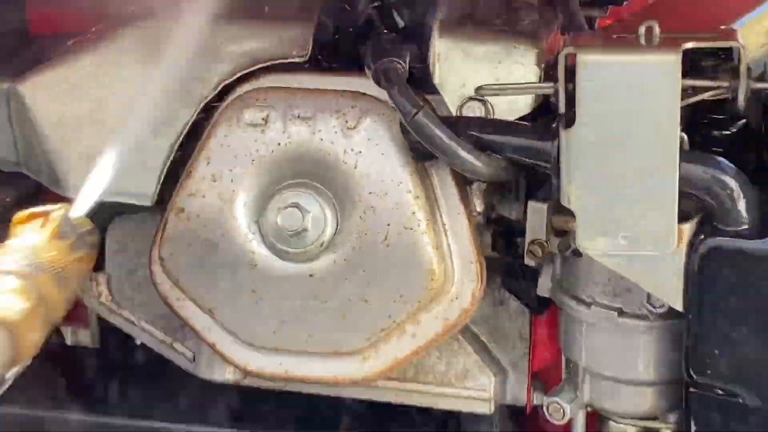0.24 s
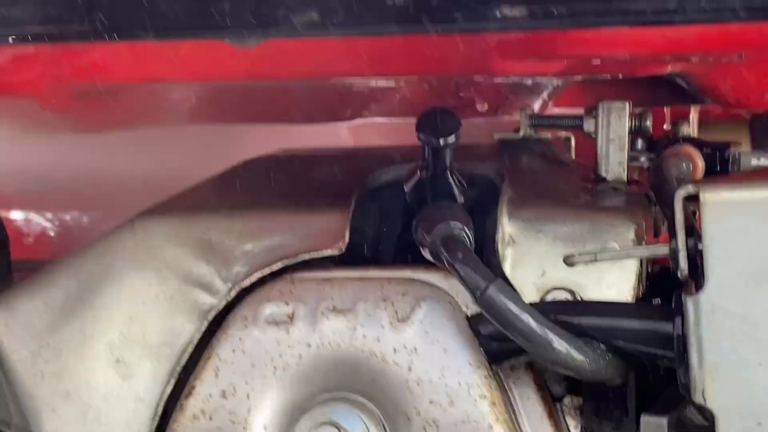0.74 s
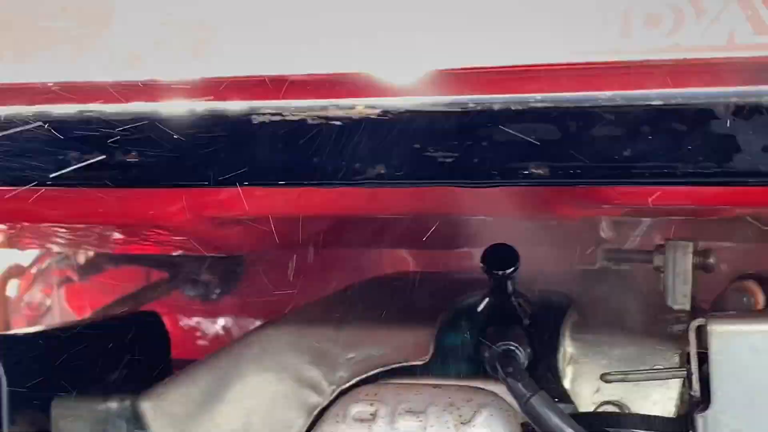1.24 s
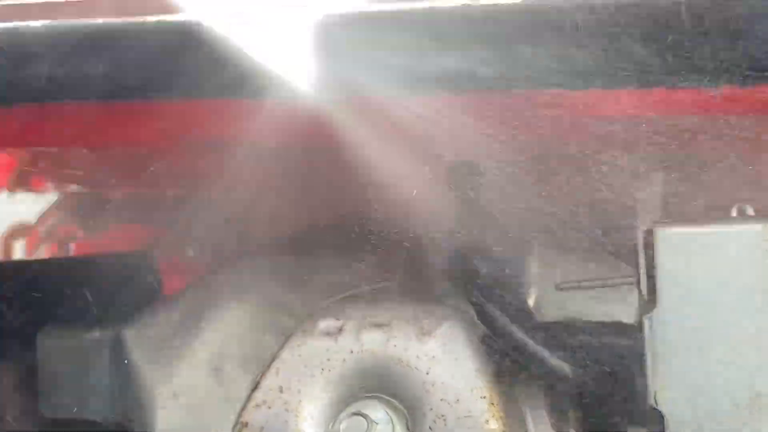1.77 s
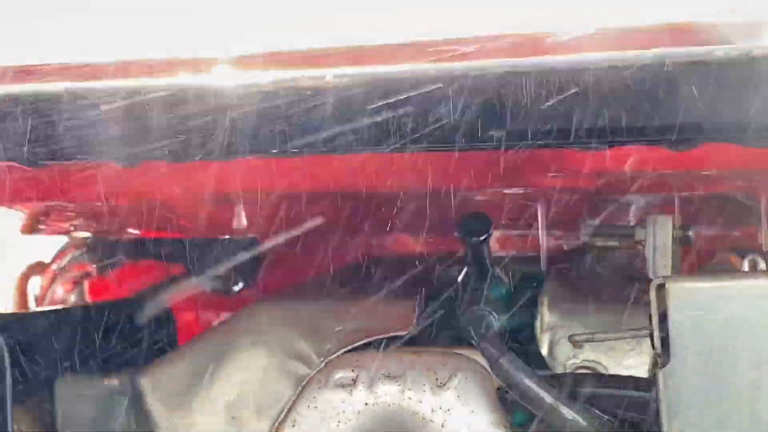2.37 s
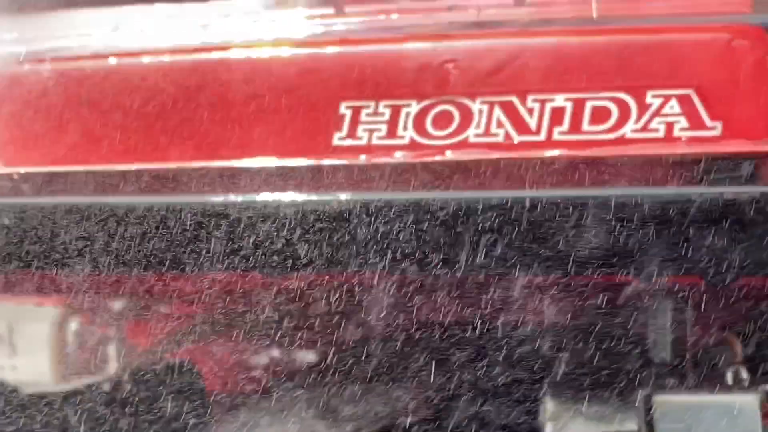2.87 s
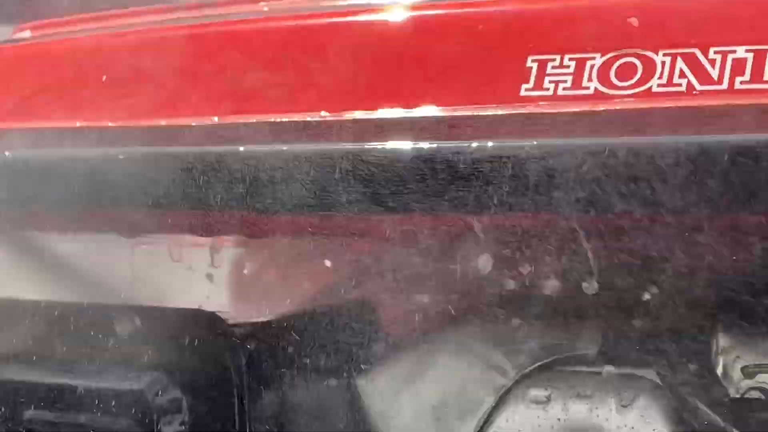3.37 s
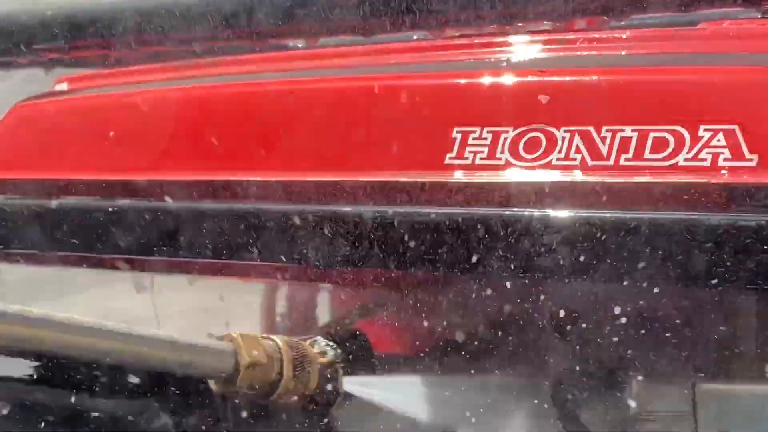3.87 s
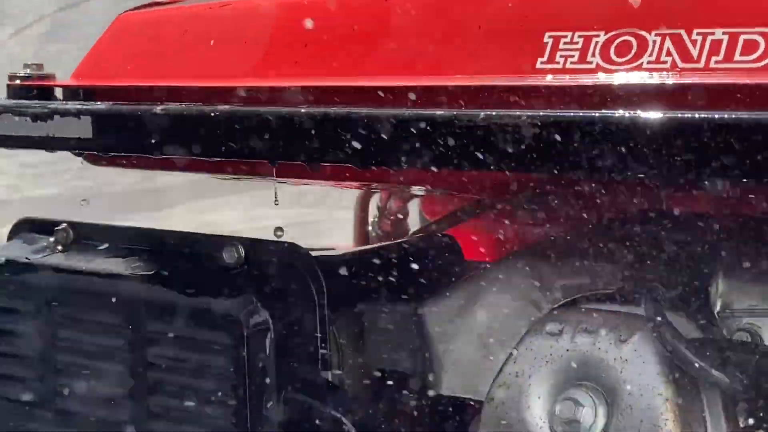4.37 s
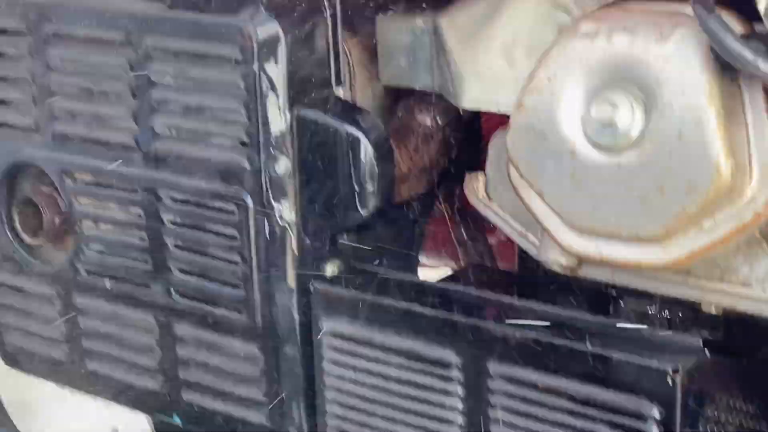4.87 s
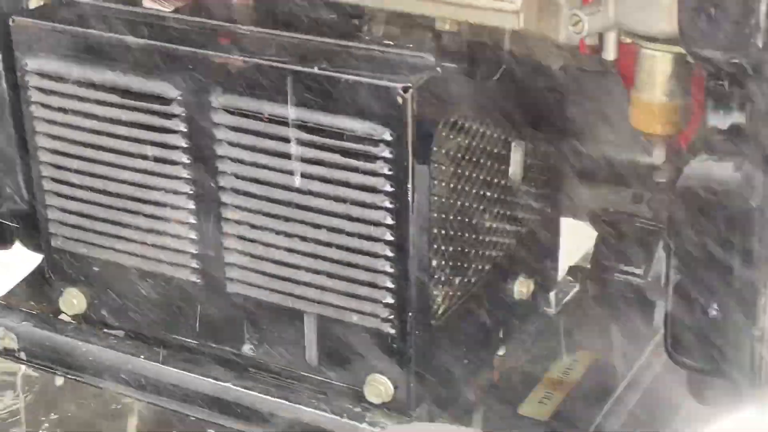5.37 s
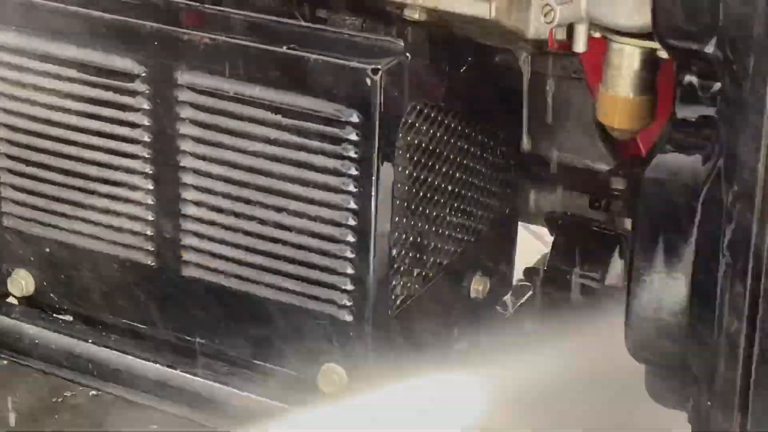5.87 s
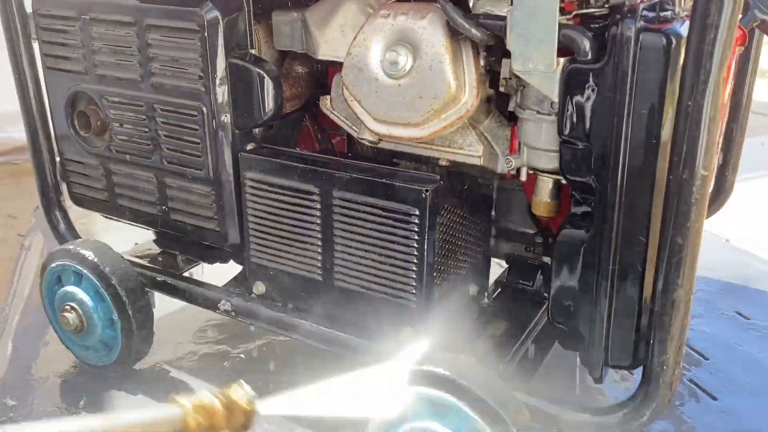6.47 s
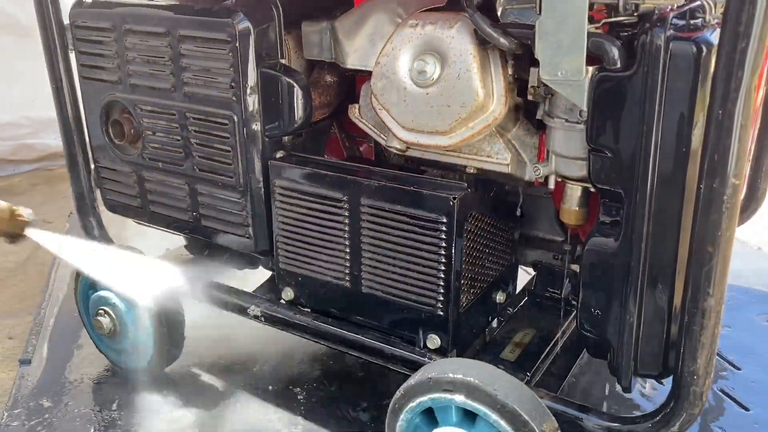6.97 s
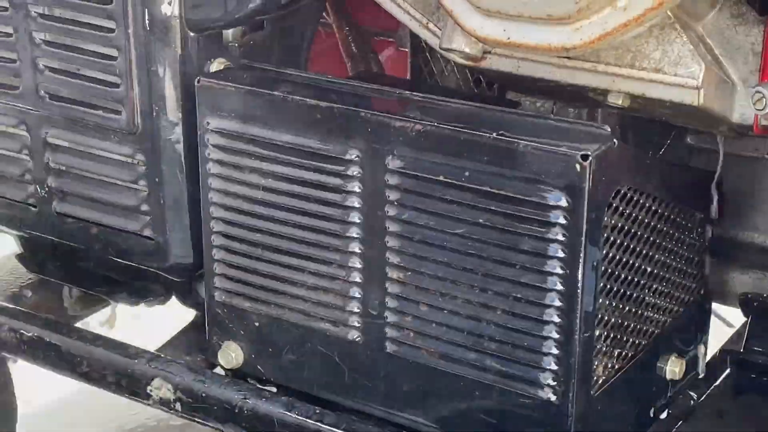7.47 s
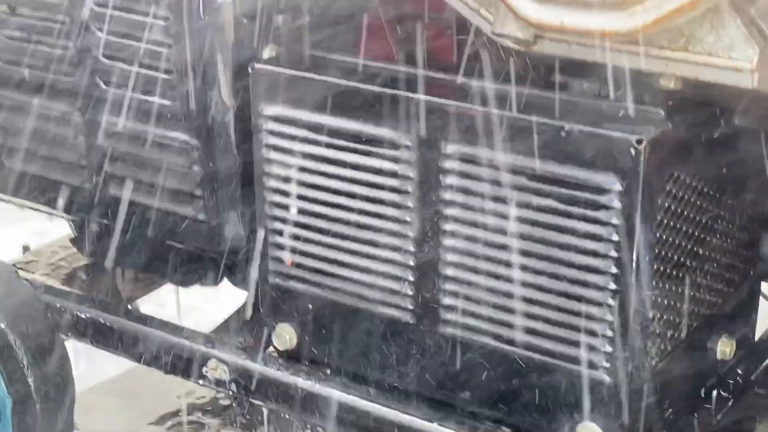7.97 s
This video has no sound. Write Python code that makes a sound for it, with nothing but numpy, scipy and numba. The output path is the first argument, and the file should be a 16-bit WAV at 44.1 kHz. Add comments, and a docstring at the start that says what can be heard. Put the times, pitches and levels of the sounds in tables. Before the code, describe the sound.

A soft watery hiss swells within a third of a second into a forceful spray on steel. The jet sputters across engine, tank, tube and covers, its tone changing with each part, with short splashes and brief dropouts. A pump drones below with a high whine. Near microphone, open yard, mostly narrow stereo, widening between about six and seven seconds.

```python
"""A soft hiss and churn of water over a pump's tone, soon surging: a pressure washer sweeps its fan jet
over the steel frame and engine of a portable generator, outdoors. The hiss is turbulent noise; random drop
impacts, filtered, sizzle on metal, churn in gaps and drum on panels. Parts ring in their modes, short bursts of
splash and airy noise break in, a slot whistles. Pump and motor are sums of sines; vent and yard filtered noise."""
import sys
import numpy as np
from scipy import signal
from scipy.fft import rfft, irfft
from scipy.io import wavfile
from scipy.ndimage import uniform_filter1d
from numba import njit

SR = 44100
rng = np.random.default_rng(int(sys.argv[2]) if len(sys.argv) > 2 else 0)


def master_out(mix):
    """Clip the mix to full scale and print it as 16-bit PCM to the path in sys.argv[1]."""
    frames = np.transpose(np.atleast_2d(mix))
    ceiling = np.clip(frames, -1, 1)
    pcm = np.round(ceiling * 32767).astype(np.int16)
    wavfile.write(sys.argv[1], SR, pcm)


N = 363384
TIME, FREQ = np.arange(N) / SR, np.arange(N // 2 + 1) * SR / N


def undb(db):
    """Level definition: decibels to amplitude gain."""
    return 10 ** (np.asarray(db) / 20)


def unit(x):
    """Effective value: scale to an rms of 1."""
    return x / np.sqrt(np.mean(x ** 2))


def curves(table):
    """Linear interpolation in time: one value a sample for each column after t."""
    s, *columns = np.transpose(table)
    return [np.interp(TIME, s, c) for c in columns]


def response(points):
    """Frequency response: gain at every frequency from (f/Hz, level/dB) points on a log axis."""
    hz, db = np.transpose(points)
    return undb(np.interp(np.log(FREQ + 1), np.log(hz), db))


def colour(x, gain):
    """Linear filtering: multiply the spectrum by a gain at every frequency."""
    return irfft(rfft(x) * gain, N)


def resonance(hz, width_hz):
    """Damped oscillator: response of one mode, gain 1 at its centre."""
    return 1j * FREQ * width_hz / (hz ** 2 - FREQ ** 2 + 1j * FREQ * width_hz)


@njit
def moving_band(x, hz, width):
    """Time-varying resonance: a state-variable band-pass whose centre moves."""
    y, band, low = np.empty(len(x)), 0., 0.
    for i in range(len(x)):
        g, k = np.tan(np.pi * hz[i] / SR), width / hz[i]
        v = (band + g * (x[i] - low)) / (1 + g * (g + k))
        band, low, y[i] = 2 * v - band, low + 2 * g * v, k * v
    return y


def hollow(x, hz, width_hz):
    """Cavity resonance: the ring of an enclosed space whose pitch moves."""
    return np.array([moving_band(c, hz, float(width_hz)) for c in x])


def walk(rate):
    """Low-passed randomness: smooth wandering, spread 1, up to about rate turns a second."""
    return unit(colour(rng.standard_normal(N), 1 / (1 + (FREQ / rate) ** 4)))


def noise():
    """Turbulence: white noise as a direct (mid) and a scattered (side) part."""
    return rng.standard_normal((2, N))


def drops(rate):
    """Shot noise: random impacts of unequal size, rate a second, mid and side."""
    hit = rng.random((2, N)) < rate / SR
    size_db = 2 * np.clip(noise(), -2, 2)
    return unit(hit * noise() * undb(size_db))


DWELL_ATTACK_S, DWELL_RELEASE_S = 0.014, 0.032


def hold(start, length, attack_s=DWELL_ATTACK_S, release_s=DWELL_RELEASE_S):
    """Gated excitation: a linear attack, a hold and a linear release."""
    rise, fall = (TIME - start) / attack_s, (start + length - TIME) / release_s
    return np.clip(np.minimum(rise, fall) + .5, 0, 1)


# the jet dwells on a part: start t/s, length t/s, level/dB before each sound's own gain,
# depth 0-1 (0 bare face, .5 gap, 1 hollow behind a sheet panel)
DWELLS = [(.12, 0.072, -32, 1), (.31, 0.09, -23.5, 0.77), (0.484, 0.059, -24, 0.027),
          (.64, 0.066, -26, 0.64), (.72, 0.21, -28.5, 1), (1.36, 0.3, -32.5, 0.72),
          (1.62, 0.14, -29.5, 0.66), (1.76, 0.058, -30.5, 0.68), (2.56, 0.077, -34.5, 0.61),
          (3.191, 0.12, -32, 0.83), (3.21, 0.078, -30.5, 0.17), (3.401, 0.14, -30.5, 0.76),
          (3.71, 0.034, -33, 0.78), (3.96, 0.18, -34, 0.43), (4.243, 0.022, -25, .1), (4.3, 0.032, -27, .1),
          (4.558, .46, -37, 0.94), (5.031, 0.1, -29.5, 0.3), (5.27, 0.027, -30, 0.17),
          (5.34, 0.081, -31, 0.51), (5.45, 0.13, -23, 0.24), (5.529, 0.12, -30.5, 0.32),
          (5.66, 0.283, -29.5, 0.68), (5.925, 0.071, -25.5, 0.12), (6.149, 0.089, -29.5, 0.3),
          (6.35, 0.12, -32, 0.6), (6.53, .11, -28, 0.089), (6.929, 0.053, -28, 0.42),
          (7.481, 0.17, -36.5, 0.67), (7.63, 0.12, -29.5, 0.66), (7.78, 0.042, -25.5, 0.61),
          (7.701, 0.095, -26.5, 0.13)]
# which depth wakes each sound: best depth 0-1, reach in depth, gain at the best depth level/dB
WAKES = {"hiss": (0, 0.41, -7.5), "sizzle": (0.017, 0.66, -0.46), "churn": (0.48, 0.21, 0.12),
         "drum": (0.96, 0.51, -3.5)}


def woken(name, steady_db):
    """Power summation: level/dB of one sound, its steady part plus every dwell near its best depth."""
    best, reach, best_db = WAKES[name]
    power = undb(steady_db) ** 2
    for start, length, db, depth in DWELLS:
        match = .5 ** (((depth - best) / reach) ** 2)
        power = power + (hold(start, length) * undb(db + best_db) * match) ** 2
    return 10 * np.log10(power)


GAP_SHALLOW_HZ, GAP_FALL_OCTAVES, RESTING_DEPTH = 2650, 1.63, 0.37


def gap_pitch(runoff_db):
    """Cavity tuning: the gap rings lower the deeper the jet reaches, back at rest between dwells."""
    weight = undb(runoff_db)
    depths = weight * RESTING_DEPTH
    for start, length, db, depth in DWELLS:
        force = hold(start, length) * undb(db)
        weight, depths = weight + force, depths + force * depth
    return GAP_SHALLOW_HZ * 2 ** (-GAP_FALL_OCTAVES * depths / weight)


# aim of the fan toward the listener: t/s, gain above BEAM_HZ level/dB
AIM = [(0, 5), (1.7, -.5), (2.8, 0.5), (3.6, -0.5), (4.7, -6.5), (5.6, 0.5), (7.2, -0.5), (8, 6.5)]
BEAM_HZ = 9700


def beamed(x):
    """Directivity: the highest hiss is beamed and brightens as the fan turns to the listener."""
    aim_db, = curves(AIM)
    top = colour(x, 1 - 1 / (1 + (FREQ / BEAM_HZ) ** 8))
    return x + top * (undb(aim_db) - 1)


# steady spray as the wand moves nearer and farther, before dwells, misses and trims:
# t/s, nozzle hiss level/dB, droplet sizzle level/dB, churning run-off level/dB
WAND = [(0, -39.5, -37, -36.5), (.25, -31.5, -29, -33), (.85, -32.5, -31, -36.5), (.95, -26.5, -27.5, -36),
        (1.42, -31.5, -28, -42), (1.85, -30.5, -29, -39), (2.5, -29, -33.5, -46), (2.75, -32, -37.5, -50),
        (3.04, -32, -36.5, -62), (3.12, -34.5, -36.5, -50), (3.76, -33, -36.5, -46),
        (3.97, -29.5, -34.5, -36), (4.47, -30, -26.5, -36), (4.7, -30.5, -28, -34.5),
        (5.22, -32, -30.5, -39.5), (6.3, -34, -32, -35), (6.8, -37, -39, -38), (7.65, -36.5, -31, -36.5),
        (8.24, -40, -33.5, -38.5)]
# the jet slips through an opening and meets less metal: start t/s, length t/s, change of level/dB
MISSES = [(0.58, 0.062, -3), (1.544, 0.062, -5.5), (2.318, 0.06, -7), (3.556, 0.13, -12),
          (6.086, 0.048, -2.5), (6.378, 0.039, -14)]
# relative spectra of the four sounds of the spray: f/Hz, level/dB
HISS = [(1500, -55), (4000, -1.5), (7000, -0.5), (9000, 0), (11000, 1), (13300, 0), (15800, -1.5)]
SIZZLE = [(1200, -18.5), (2400, -1.5), (3200, -3.5), (4300, -2), (5400, -0.5), (7000, -5), (11000, -30)]
CHURN = [(400, -41), (800, -1.5), (1100, 3.5), (1450, 2), (2000, -3), (2600, -0.5), (4000, -34)]
DRUM = [(30, -50), (55, -60), (85, -7), (130, -7.5), (220, 2), (380, 4), (520, 7), (800, 3), (1100, 0.5),
        (2000, -9)]
# ringing of the frame and covers: f/Hz, width f/Hz, level/dB over the broad splash
FRAME = [(758, 97, 0), (1474, 140, -5.5), (1640, 79, -18), (1900, 810, 0.5), (3160, 1100, 4.5),
         (3760, 130, -9)]
MISS_HISS_SHARE, MISS_CHURN_SHARE = 0.29, .5  # shares of a miss's dB that these sounds lose
RUNOFF_DRUM_DB = -2  # drumming of the panels against the run-off
GAP_RING, GAP_WIDTH_HZ = .6, 310
PANEL_RATIO, PANEL_WIDTH_HZ, PANEL_RING = 0.68, 250, 0.4  # the panel rings at this share of the gap's pitch


def spray():
    """Jet break-up and forced vibration: turbulence, drops and slugs set the steel ringing."""
    nozzle_db, droplet_db, runoff_db = curves(WAND)
    miss_db = sum(db * hold(start, length) for start, length, db in MISSES)
    hiss_db = woken("hiss", nozzle_db + MISS_HISS_SHARE * miss_db)
    sizzle_db = woken("sizzle", droplet_db + miss_db)
    churn_db = woken("churn", runoff_db + MISS_CHURN_SHARE * miss_db)
    drum_db = woken("drum", runoff_db + RUNOFF_DRUM_DB)
    gap_hz = gap_pitch(runoff_db)
    steel = 1 + sum(undb(db) * resonance(hz, width) for hz, width, db in FRAME)
    # the harder the jet bites into the frame, the more the whole splash sputters
    sputter = walk(rate=22.5) * undb(0.38 * (churn_db - churn_db.max()))
    hiss = unit(colour(noise() + 0.15 * drops(rate=1100), response(HISS)))
    sizzle = unit(colour(drops(rate=20000), response(SIZZLE) * steel))
    churn = unit(colour(drops(rate=10000), response(CHURN) * steel))
    drum = unit(colour(drops(rate=3000), response(DRUM) * steel))
    # the gap behind the struck spot rings at a pitch that follows the jet and wavers
    wavering_hz = gap_hz * undb(walk(rate=41))
    churn = unit(churn + GAP_RING * hollow(churn, wavering_hz, GAP_WIDTH_HZ))
    drum = unit(drum + PANEL_RING * hollow(drum, PANEL_RATIO * gap_hz, PANEL_WIDTH_HZ))
    # each sound: its level, a fixed trim where given, shared sputter and its own flutter, all in dB
    return (beamed(hiss) * undb(hiss_db + 3.5 + 1.44 * sputter)
            + sizzle * undb(sizzle_db - 1.33 + 2.0 * sputter + 0.32 * walk(rate=28))
            + churn * undb(churn_db + 1.0 * sputter + 1.4 * walk(rate=26))
            + drum * undb(drum_db + 0.28 * sputter + 2.0 * walk(rate=19.5)))


# mean speed of the washer's motor: t/s, shaft f/Hz
MOTOR = [(0, 502.2), (1.2, 500.5), (3, 500.2), (4.9, 501), (5.6, 502), (6.9, 502.1), (7.6, 502.6),
         (8.24, 502.1)]
# pump overtones: multiple of the pump shaft, level/dB before the hum gain
PUMP = [(8, -62), (9, -59), (10, -61), (12, -61), (13, -55), (15, -62), (29, -59)]
# the washer as heard from each standing place: t/s, pump hum gain level/dB,
# piston stroke tone level/dB, its octave level/dB, commutator whine level/dB
WASHER = [(0, -3, -43, -51.5, -45), (.85, 8, -42, -46.5, -39), (1.05, 6, -50, -54, -43),
          (2.4, 3, -52.5, -54, -51), (3.7, 3.5, -55.5, -50.5, -46), (4.5, 2, -53, -57, -44),
          (5.6, 9, -50, -48, -44), (6.4, 7, -54.5, -48, -52), (7, 8.5, -49, -47.5, -45),
          (7.5, 6.5, -54, -41.5, -41), (8.24, 10, -48, -44, -41.5)]
GEAR_RATIO, COMMUTATOR_BARS, PISTONS = 50 / 11, 22, 3
WHINE_FLUTTER_DB, STROKE_FLUTTER_DB, HUM_FLUTTER_DB = 1.8, 1.6, 1.5


def washer():
    """Harmonics of rotation: a brush motor geared down to a three-piston pump, each overtone wavering."""
    motor_hz, = curves(MOTOR)
    hum_db, stroke_db, octave_db, whine_db = curves(WASHER)
    motor = 2 * np.pi * np.cumsum(motor_hz * (1 + 0.00019 * walk(rate=13.0))) / SR  # shaft angle
    pump = motor / GEAR_RATIO
    hum = stroke = 0
    for k, db in PUMP:
        hum = hum + undb(db + HUM_FLUTTER_DB * walk(rate=8.2)) * np.sin(k * pump + rng.uniform(0, 2 * np.pi))
    for k, db in enumerate([stroke_db, octave_db], 1):
        stroke = stroke + undb(db + STROKE_FLUTTER_DB * walk(rate=19)) * np.sin(k * PISTONS * pump)
    whine = undb(whine_db + WHINE_FLUTTER_DB * walk(rate=22)) * np.sin(COMMUTATOR_BARS * motor)
    return np.sqrt(2) * (hum * undb(hum_db) + stroke + whine)  # rms levels to sine peaks


def vent():
    """Flow noise through a resonance: cooling air in the motor's vents, nearer or farther with its hum."""
    hum_db = curves(WASHER)[0]
    air = unit(colour(noise(), resonance(3260, width_hz=380) ** 2))
    return air * undb(-48.5 + .5 * hum_db)


# relative spectrum of the low rush of the yard: f/Hz, level/dB
YARD = [(30, -52), (50, -52), (85, -1.5), (150, 3), (300, -1.5), (700, 3), (1500, -0.5), (5000, -12)]


def yard():
    """Diffuse background: steady noise shaped by one spectrum."""
    return undb(-46.0) * unit(colour(noise(), response(YARD)))


# modes of the parts that the jet rests on: f/Hz, nominal width f/Hz, relative level/dB
PART_MODES = {"valve cover": [(1270, 110, -1), (2200, 82, 1.5), (3180, 160, 1), (4420, 210, -4)],
              "tank": [(1330, 98, -1), (2460, 170, -4), (3170, 120, 4), (4003, 250, 4), (5080, 340, 5)],
              "frame tube": [(1690, 350, 0), (2970, 110, 3.5), (3600, 130, 1)], "cover": [(780, 120, 1.5),
              (1055, 160, 4), (1510, 550, 0), (3850, 100, -3), (4800, 130, -9)],
              "base rail": [(1120, 140, -2), (1390, 150, -2), (1990, 250, -0.5), (3440, 93, -1),
              (3750, 100, -2.5)], "wheel": [(540, 180, -0.5), (1024, 230, 1.5), (1470, 300, -5.5)]}
# the jet rests on a part and rings it: start t/s, length t/s, level/dB before flutter
RESTS = {"valve cover": [(.32, .06, -24)], "tank": [(.9, 0.38, -35.5), (1.75, .78, -35)],
         "frame tube": [(3.88, 0.59, -36)], "cover": [(4.56, 0.2, -28), (4.79, 0.23, -27.5),
         (5.66, 0.234, -34)], "base rail": [(5.915, 0.15, -29.5), (6.14, 0.14, -28.5), (6.515, 0.15, -29),
         (6.7, 0.04, -30)], "wheel": [(6.76, 0.14, -32), (7.115, 0.22, -33), (7.345, 0.1, -33),
         (7.58, 0.18, -33)]}
REST_EDGE_S = 0.024
PART_FILL_DB, PART_FLUTTER_DB = -13.5, 1  # splash between the modes; sputter of the stream


def parts():
    """Modal excitation: a dense stream of drops rings each part in its own modes while the jet rests on it."""
    out, stream = np.zeros((2, N)), rfft(drops(rate=7000))
    for name, modes in PART_MODES.items():
        power = force = 0
        for hz, width, db in modes:
            mode = np.abs(resonance(hz, 1.25 * width)) ** 4
            fill = undb(PART_FILL_DB) ** 2 * np.abs(resonance(hz, .5 * hz)) ** 4
            power = power + undb(db) ** 2 * (mode + fill)
        for start, length, db in RESTS[name]:
            force = force + hold(start, length, REST_EDGE_S, REST_EDGE_S) * undb(db)
        out += unit(irfft(stream * np.sqrt(power), N)) * force
    return out * undb(PART_FLUTTER_DB * walk(rate=29))


def swell(start, length):
    """Transient envelope: a nearly even rise and fall."""
    u = np.clip((TIME - start) / max(length, .005), 0, 1)
    return np.abs(np.sin(np.pi * u ** 1.03))


# brief bursts of splash, from sharp slaps to longer soft swells:
# t/s, nominal peak level/dB, centre f/Hz, length t/s
SPLASH_BURSTS = [(0.321, -9, 3160, 0.064), (0.366, -13, 685, 0.045), (0.461, -12.5, 790, 0.039),
                 (1.395, -10, 1450, 0.026), (1.51, -8.5, 1480, 0.049), (1.61, -19, 1640, 0.18),
                 (3.207, -24, 800, 0.087), (3.416, -24.5, 1000, 0.15), (3.842, -8, 3700, 0.0088),
                 (3.843, -16, 1950, 0.017), (3.875, -14, 2640, 0.026), (4.05, -18, 1900, 0.016),
                 (4.092, -11, 3520, 0.016), (4.115, -7.5, 3030, 0.039), (4.175, -13, 850, 0.035),
                 (4.35, -13, 3400, 0.027), (4.872, -21, 855, 0.017), (5.137, -14, 5500, 0.013),
                 (5.346, -25, 500, 0.022), (5.48, -14, 1910, 0.028), (5.8, -14.5, 1130, 0.053),
                 (6.358, -13, 5200, 0.0098), (6.373, -15.5, 1200, 0.041), (6.447, -12, 5000, 0.0072),
                 (6.505, -17, 1450, 0.032), (7.657, -11.5, 990, 0.054)]
# short flat-topped bursts of airy noise, some narrow, some broad:
# t/s, length t/s, f/Hz, nominal width f/Hz, level/dB
AIR_BURSTS = [(.415, 0.045, 13400, 1530, -30), (0.487, 0.081, 8800, 1500, -30.5),
              (0.872, 0.16, 4370, 2000, -28.5), (2.064, 0.067, 5300, 2000, -32),
              (5.084, 0.032, 4250, 1300, -28), (5.257, 0.047, 2330, 1100, -30),
              (5.25, 0.046, 4510, 490, -36), (6.271, 0.073, 5660, 3400, -28.5),
              (6.434, 0.074, 4800, 3000, -30), (7.007, 0.076, 5150, 1200, -32),
              (7.443, 0.039, 5400, 1500, -31.5)]
SPLASH_RMS_DB = -12.5  # rms of a splash burst's noise against its nominal peak
THUD_HZ, THUD_DB = 176, -31  # a dull thud under each splash burst; dB against its nominal peak
THUD_FADE_HZ = 1490  # splash bursts brighter than this hardly thud
AIR_EDGE_S = 0.011


def bursts():
    """Gated band noise: bursts of splash with a dull thud, and flat-topped bursts of airy noise."""
    out, splash, air = np.zeros((2, N)), rfft(drops(rate=30000)), rfft(noise())
    thud = undb(THUD_DB) * unit(irfft(air * resonance(THUD_HZ, THUD_HZ) ** 2, N))
    for s, db, hz, length in SPLASH_BURSTS:
        burst = undb(SPLASH_RMS_DB) * unit(irfft(splash * resonance(hz, hz) ** 2, N))
        faded_thud = thud / (1 + (hz / THUD_FADE_HZ) ** 2)
        out += (burst + faded_thud) * swell(s, length) * undb(db)
    for s, length, hz, width, db in AIR_BURSTS:
        burst = unit(irfft(air * resonance(hz, width) ** 2, N))
        out += burst * hold(s, length, AIR_EDGE_S, AIR_EDGE_S) * undb(db)
    return out


# the jet runs along a slot in the frame and whistles: t/s, f/Hz, level/dB
WHISTLE = [(2.5, 4050, -60), (2.62, 4040, -37), (2.82, 4165, -44), (3.02, 4500, -36.5), (3.14, 4500, -46),
           (3.38, 4350, -54), (3.45, 4480, -33), (3.56, 4550, -57)]
WHISTLE_WIDTH_HZ = 240


def whistle():
    """Narrow-band flow tone: an airy whistle, noise through two moving resonances, that drifts mostly upward."""
    hz, db = curves(WHISTLE)
    once = hollow(noise(), hz, WHISTLE_WIDTH_HZ)
    return unit(hollow(once, hz, WHISTLE_WIDTH_HZ)) * undb(db)


# strength of the random colouring: f/Hz, spread level/dB
COLOURING = [(2500, 2.3), (9000, 1.8)]


def random_colouring(x):
    """Random spectral modulation: bands of the splash wax and wane in about a tenth of a second."""
    hz, _, z = signal.stft(x, SR, nperseg=1024)
    field = rng.standard_normal(z.shape[1:])
    for _ in range(2):
        field = uniform_filter1d(uniform_filter1d(field, size=7, axis=0), size=9, axis=1)
    spread_db = np.interp(hz, *np.transpose(COLOURING))[:, None]
    gain = undb(spread_db * unit(field))
    gain = gain / np.sqrt(np.mean(gain ** 2, axis=1, keepdims=True))  # unit mean power gain in each band
    return signal.istft(z * gain)[1][:, :N]


# the band swallowed by the space behind the covers: t/s, f/Hz, depth 0-1
DIP = [(4.4, 2700, 0.05), (4.7, 2970, 0.7), (5.8, 2860, 0.35), (7, 2410, 0), (7.55, 2380, 0.8),
       (7.85, 2690, .45)]


def cavity_dip(x):
    """Resonant absorption: the space behind the covers swallows one band, sliding as the wand moves along."""
    hz, depth = curves(DIP)
    return x - np.clip(depth, 0, 1) * hollow(x, hz, width_hz=260)


# echo off the panel beside the spray: t/s, delay t/ms, strength 0-1
BOUNCE = [(0, 0.78, 0.04), (1.9, 0.67, 0.13), (2.6, 0.61, 0.2), (3.05, 0.92, 0), (3.4, 0.98, 0.15),
          (4.4, 0.29, 0.11), (6.4, 0.565, 0), (7.1, 0.54, 0.22), (8.24, 0.71, 0)]


def panel_echo(x):
    """Comb filtering: a near panel returns the splash a moment later; the comb slides as the wand moves."""
    delay_ms, strength = curves(BOUNCE)
    then = TIME - delay_ms / 1000
    echo = np.array([np.interp(then, TIME, c) for c in x])
    return (x + strength * echo) / np.sqrt(1 + strength ** 2)


def ports(mid, side, width, lean):
    """Mid-side decoding: left and right from the direct and the scattered sound."""
    side, tilt = colour(side, response(width)), np.sqrt(response(lean))
    left, right = 2 * tilt / (tilt + 1 / tilt), 2 / tilt / (tilt + 1 / tilt)
    return np.array([colour(mid + side, left), colour(mid - side, right)])


# stereo image: f/Hz, side gain when narrow level/dB, side gain when open level/dB,
# left minus right when open level/dB
IMAGE = [(200, -20, -13, 2.5), (500, -19.5, -6.5, -0.5), (1230, -18, -5, 2.5), (2280, -8.5, 1, 1.5),
         (3520, -10, 1, -3.5), (4600, -20.5, 5, 4.5), (6240, -11, 0, 7.5), (8900, -14.5, 2, 3),
         (11100, -28, 3, 4), (13500, -35, -3, 1), (14800, -7, 0, 2)]
# the two microphone ports differ when the image is narrow: f/Hz, left minus right level/dB
LEAN = [(150, -1.3), (330, 2.5), (700, -.5), (1300, 1.5), (2100, 3.5), (3200, -1.5), (4300, 0)]
# phase between the ports when narrow: f/Hz, lead of the left phase/rad
PORT_PHASE = [(200, 0.47), (600, 0.43), (1600, 0.69), (2800, 1), (4500, -0.061), (6500, 0.39),
              (10500, 0.076), (13600, 0), (15000, -1.5)]
# the stereo image opens for a while: t/s, share of the open image 0-1
OPENING = [(5.95, 0), (6.05, 0.63), (7.25, 0.6), (7.35, 0.01)]


def stereo_image(mid, side):
    """Interchannel level and phase: a narrow image crossfades to a wide one and back."""
    image = np.array(IMAGE)
    left, right = ports(mid, side, image[:, [0, 1]], LEAN)
    turn = np.exp(.5j * np.interp(FREQ, *np.transpose(PORT_PHASE)))  # half the phase on each side
    narrow = np.array([colour(left, turn), colour(right, 1 / turn)])
    wide = ports(mid, side, image[:, [0, 2]], image[:, [0, 3]])
    share = np.clip(curves(OPENING)[0], 0, 1)
    return narrow * (1 - share) + wide * share


def scene():
    """Superposition: spray and washer over the low rush of the yard, narrow but for one wide stretch."""
    splash = cavity_dip(random_colouring(spray() + bursts()) + parts() + whistle())
    mid, side = panel_echo(splash) + vent() + yard()
    return stereo_image(mid + washer(), side)


MIC_LOW_HZ, TOP_HZ = 62.6, 15900


def record(dry):
    """Band limitation: the microphone loses the deepest bass; the recorder cuts the top."""
    thin = signal.sosfilt(signal.butter(4, MIC_LOW_HZ, "high", fs=SR, output="sos"), dry)
    return signal.sosfilt(signal.ellip(12, .1, 80, TOP_HZ, fs=SR, output="sos"), thin)


dry = scene()
out = record(dry)
master_out(out)
```